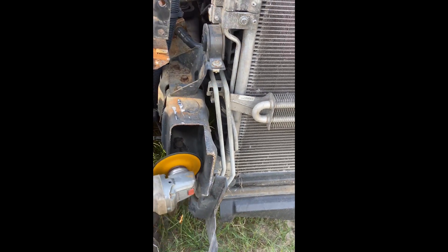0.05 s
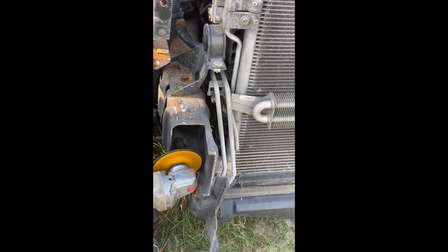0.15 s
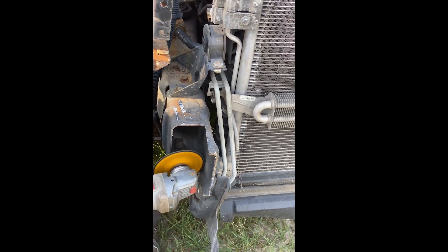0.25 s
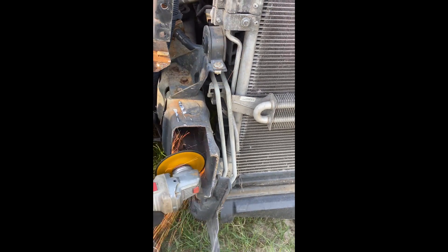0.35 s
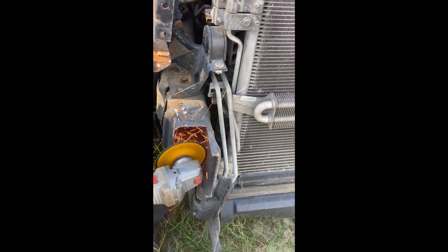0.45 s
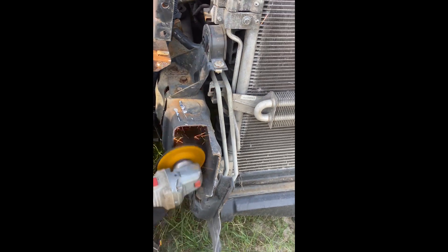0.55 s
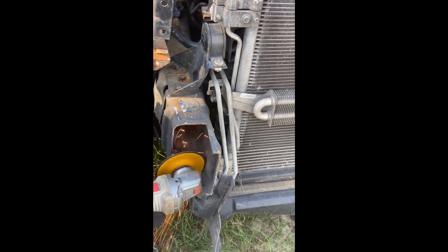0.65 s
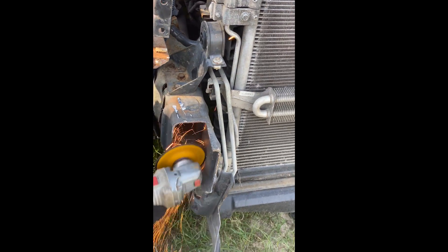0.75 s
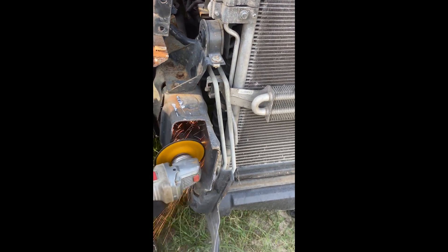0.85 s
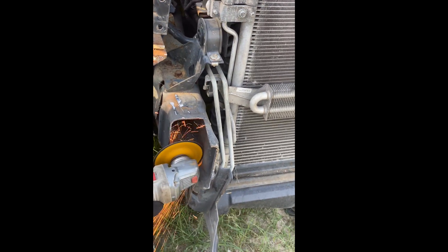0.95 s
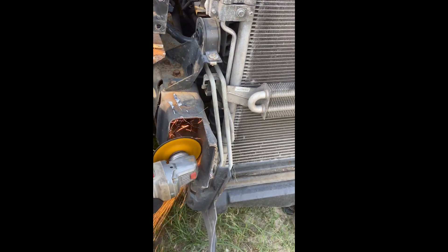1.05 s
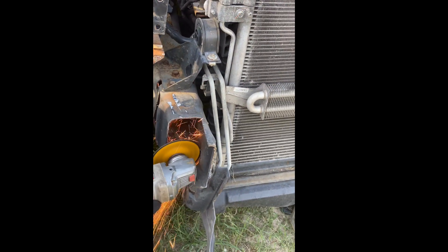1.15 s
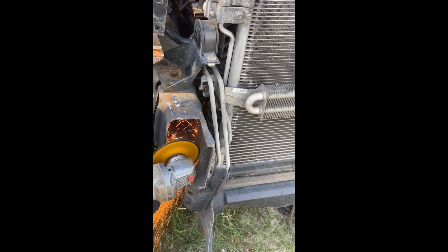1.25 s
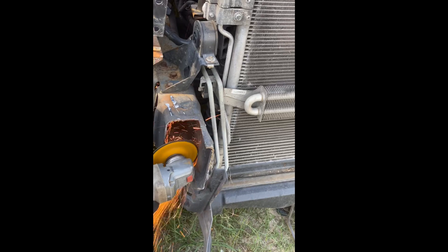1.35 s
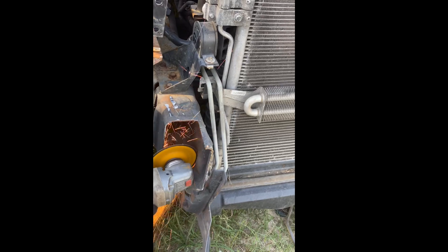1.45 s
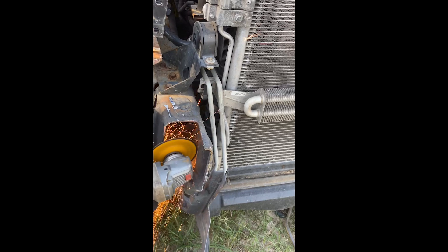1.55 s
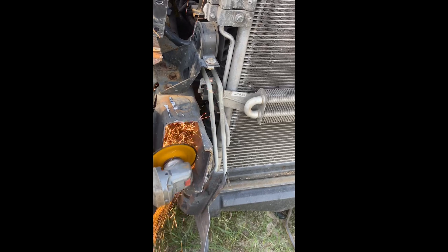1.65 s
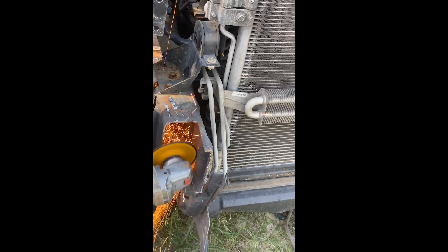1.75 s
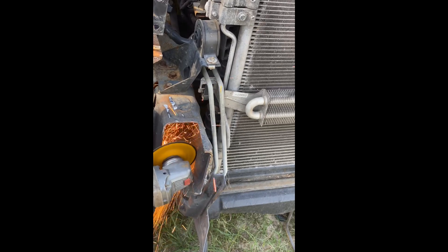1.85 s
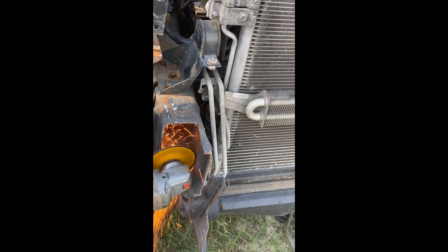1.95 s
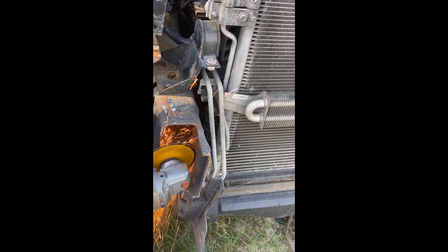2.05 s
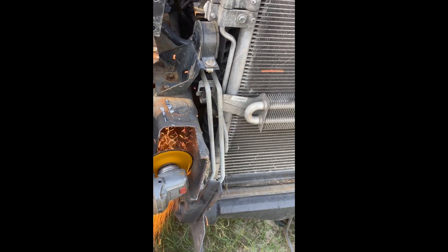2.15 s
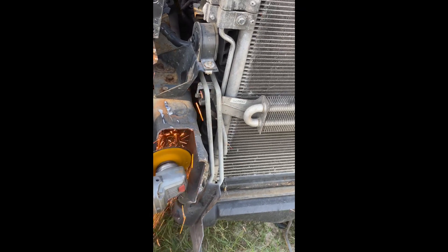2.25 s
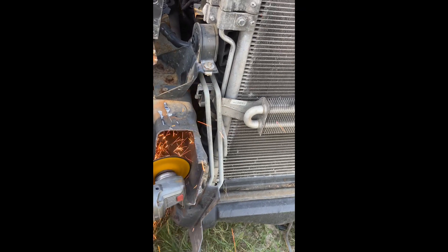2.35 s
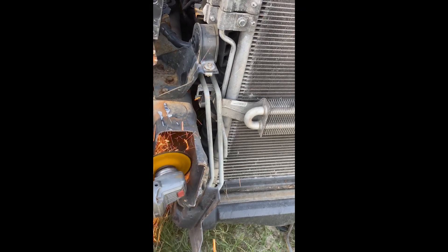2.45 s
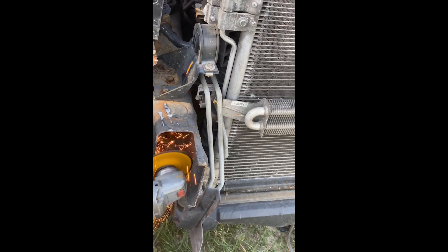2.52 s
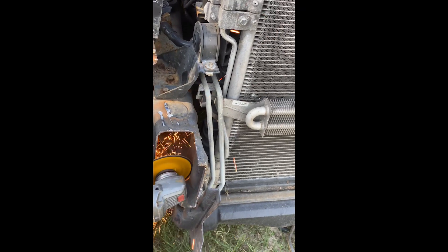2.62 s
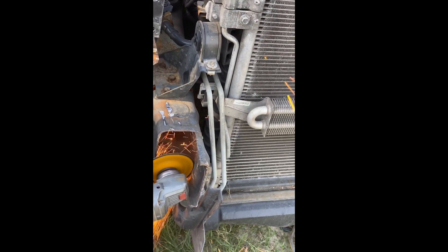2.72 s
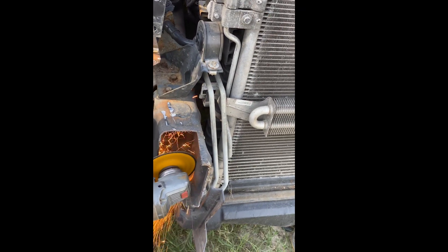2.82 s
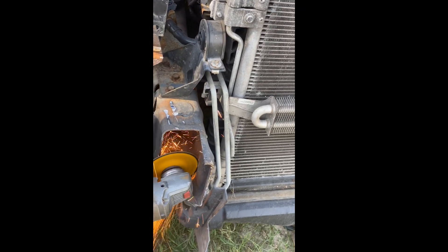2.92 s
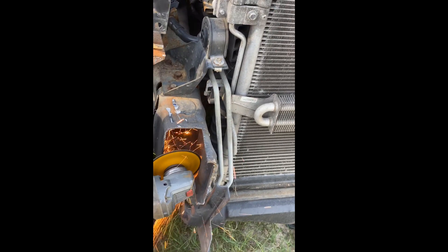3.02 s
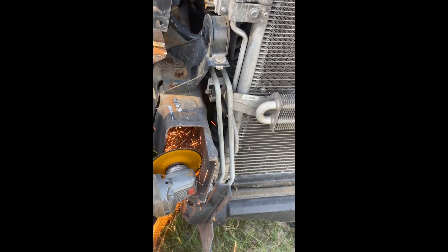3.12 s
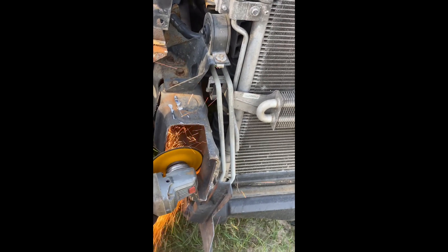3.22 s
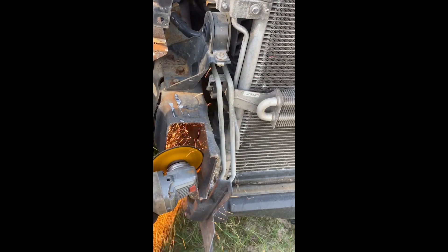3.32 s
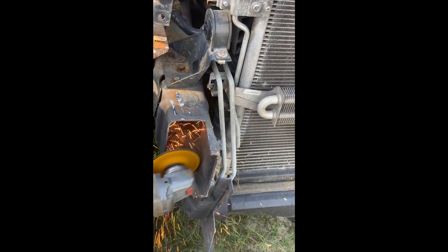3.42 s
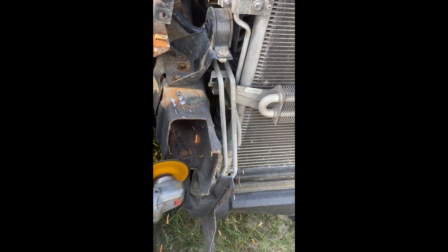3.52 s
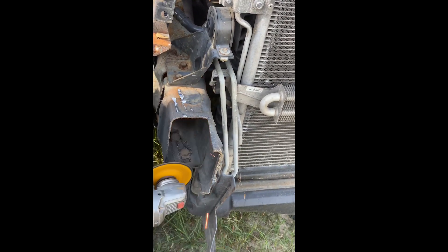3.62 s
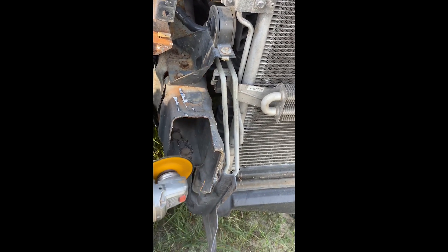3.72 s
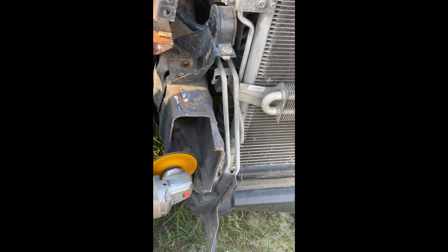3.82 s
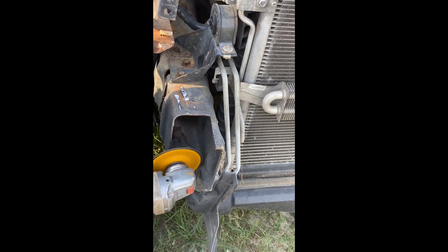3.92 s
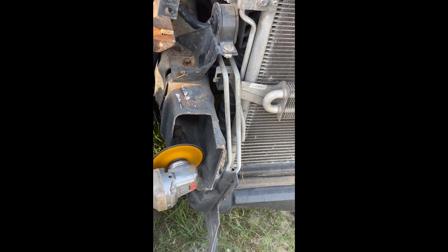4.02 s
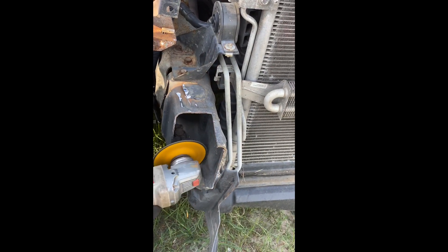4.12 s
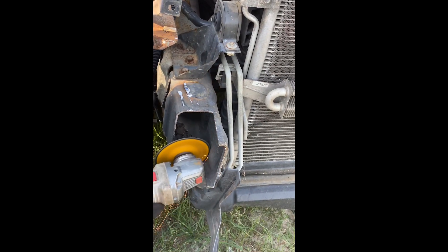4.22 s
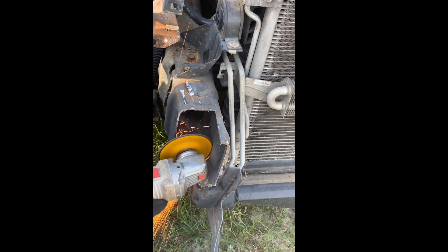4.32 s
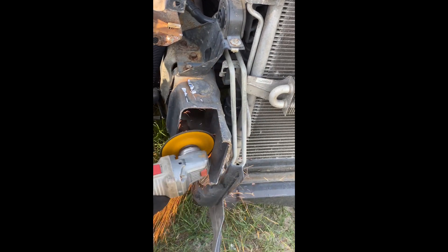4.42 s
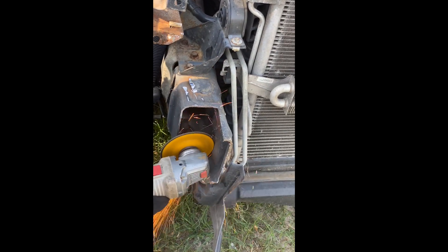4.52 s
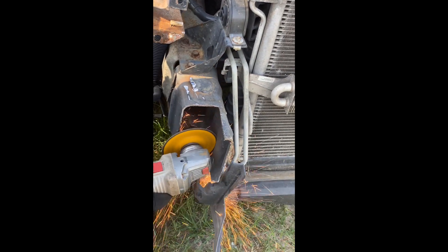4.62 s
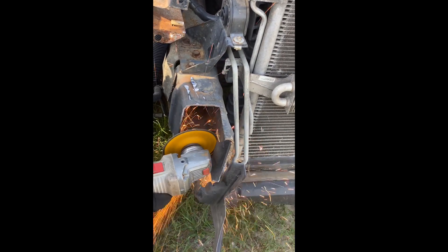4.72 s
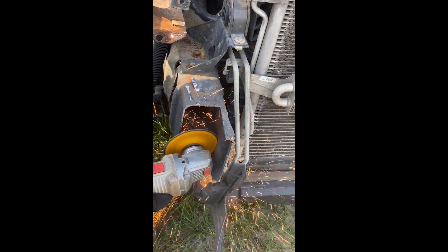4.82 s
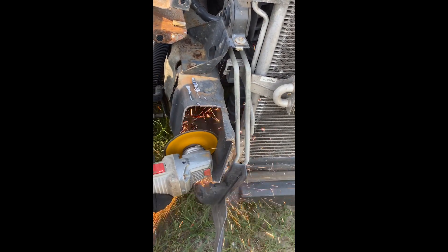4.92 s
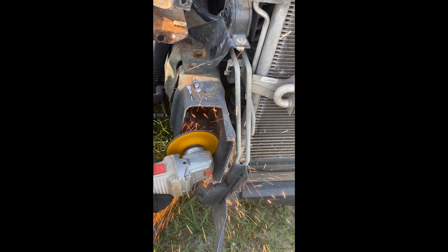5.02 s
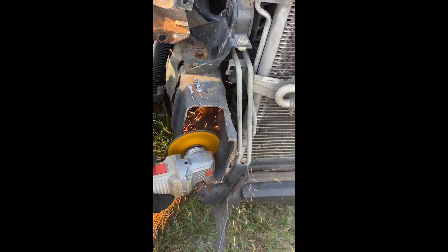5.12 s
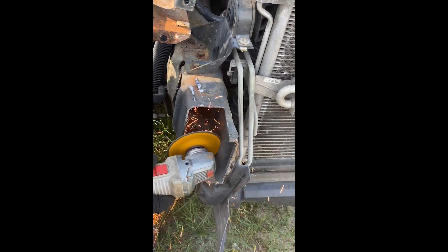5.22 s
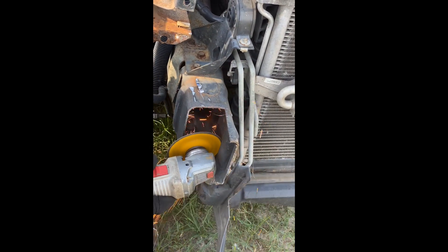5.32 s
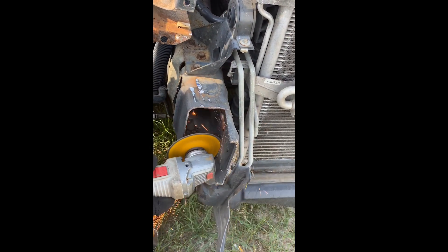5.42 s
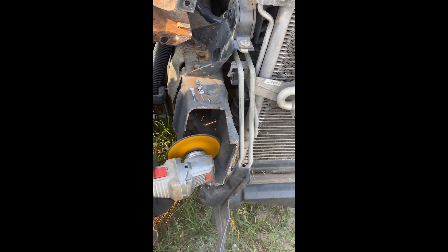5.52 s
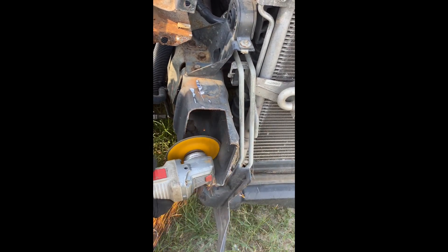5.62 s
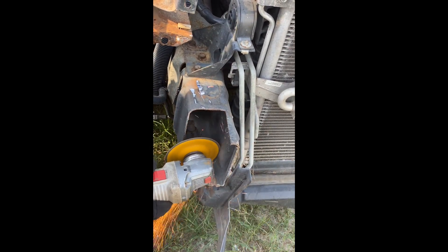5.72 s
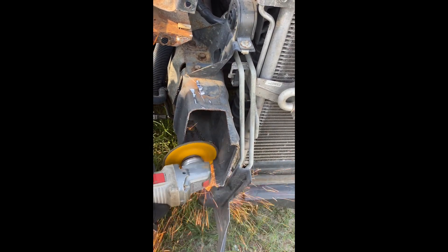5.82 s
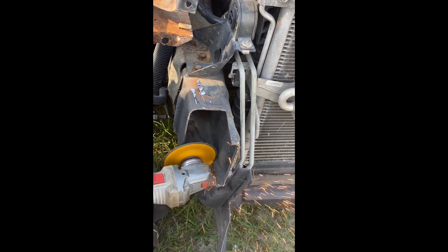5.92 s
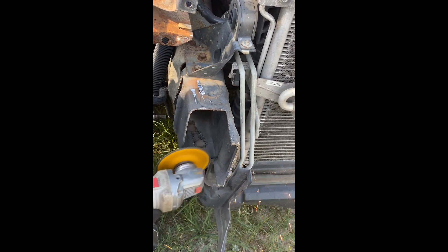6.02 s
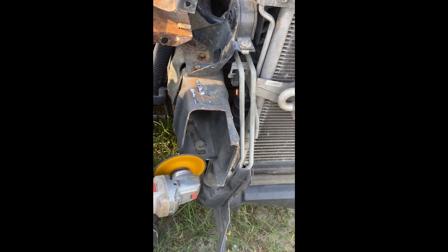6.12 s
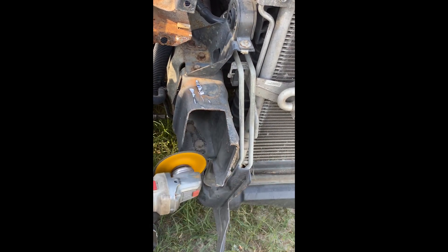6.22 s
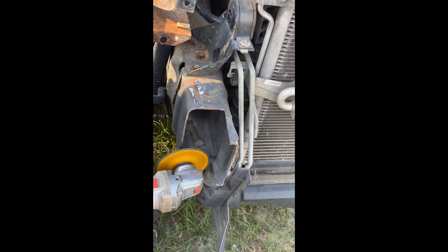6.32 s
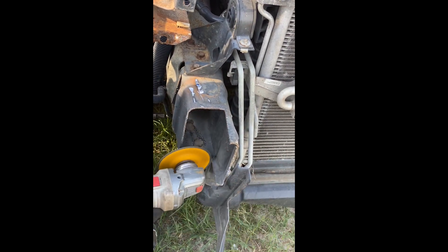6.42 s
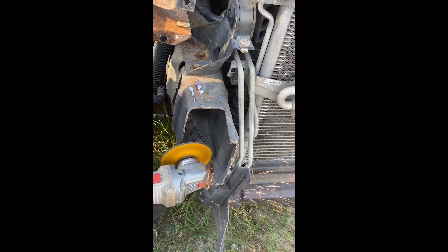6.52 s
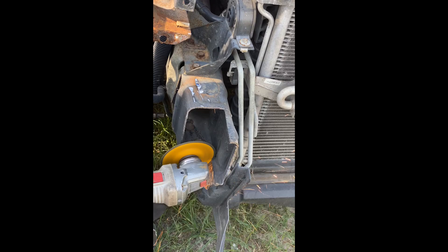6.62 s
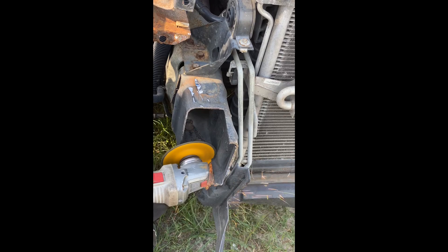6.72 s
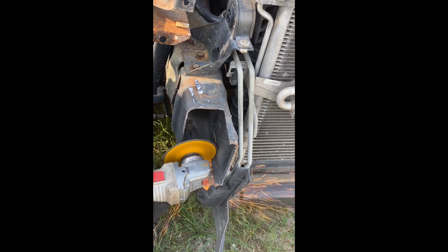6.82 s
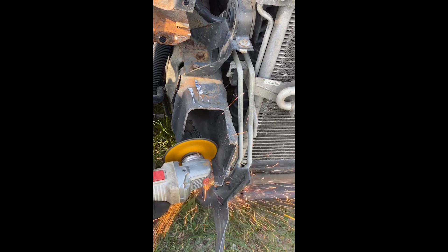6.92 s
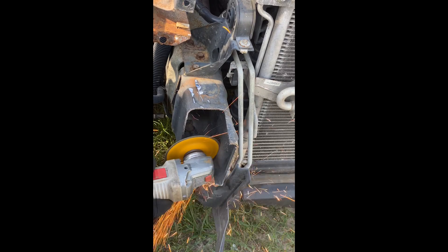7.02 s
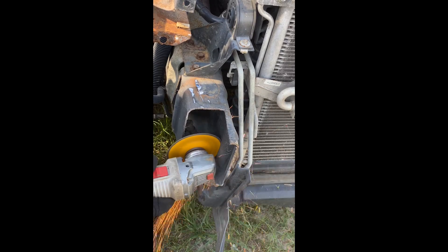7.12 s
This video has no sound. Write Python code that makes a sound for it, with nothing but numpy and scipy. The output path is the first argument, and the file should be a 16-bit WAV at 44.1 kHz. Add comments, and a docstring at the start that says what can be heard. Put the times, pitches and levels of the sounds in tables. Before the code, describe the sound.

Close harsh grinding of a spinning disc on ringing hollow steel, broken by two brief lifts where the motor revs up, with wind thumps.

```python
"""Angle grinder on a steel frame

A grinder cuts a steel vehicle frame outdoors, is lifted off twice and bites again; its motor sags under load.
The disc's uneven rim knocks once a turn and rings the frame; its grit hisses as shaped noise.
Air noise and tones locked to the armature make the motor; slack gear teeth click.
Puffs of wind thump on the microphone as pulses of falling pitch."""
import sys
import numpy as np
from scipy import signal
from scipy.fft import rfft, irfft, next_fast_len
from scipy.io import wavfile
from scipy.ndimage import uniform_filter1d

SR = 44100
rng = np.random.default_rng(int(sys.argv[2]) if len(sys.argv) > 2 else 0)


def dump_mix(stems):
    """Bounce the given channels to the path in sys.argv[1] as a 16-bit WAV at rate SR."""
    frames = np.atleast_2d(stems).T  # one column per channel
    limited = np.clip(frames, -1, 1)  # hard clip at full scale
    pcm = np.round(limited * 32767).astype(np.int16)
    wavfile.write(sys.argv[1], SR, pcm)


N = 315749
T = np.arange(N) / SR
SIZE = next_fast_len(N)
HZ = np.arange(SIZE // 2 + 1) * SR / SIZE


def undb(db):
    """Decibels to gain."""
    return 10 ** (np.asarray(db) / 20)


def unit(x):
    """Scale to rms 1."""
    return x / np.sqrt(np.mean(x ** 2))


def curve(rows):
    """Columns of a table over time, one value a sample."""
    s, *columns = np.transpose(rows)
    return [np.interp(T, s, c) for c in columns]


def over_hz(rows, hz):
    """Read (Hz, value) points on a log-frequency axis."""
    f, v = np.transpose(rows)
    return np.interp(np.log(hz + 1), np.log(f + 1), v)


def walk(rate_hz):
    """Random levels held 1 / rate_hz seconds and slewed twice; spread near 1."""
    k = int(SR / rate_hz)
    steps = np.repeat(rng.standard_normal(N // k + 1), k)
    return 1.31 * uniform_filter1d(uniform_filter1d(steps, k), k)[:N]


def colour(x, rows):
    """Shape a sound by a spectrum of (Hz, dB) points, then scale to rms 1."""
    return unit(irfft(rfft(x, SIZE) * undb(over_hz(rows, HZ)), SIZE)[:N])


def resonate(x, hz, width_hz):
    """One resonance driven by x."""
    return signal.lfilter(*signal.iirpeak(hz, hz / width_hz, SR), x)


def ring(x, modes, wander_db, rate_hz):
    """Resonances, neighbours in opposite sign; each swells and fades as the point of contact moves."""
    total = 0
    for k, (hz, width_hz, db) in enumerate(modes):
        level = undb(db + wander_db * walk(rate_hz))
        total = total + (-1) ** k * level * resonate(x, hz, width_hz)
    return unit(total)


# Armature speed under load. Each row: time in seconds, speed in turns per second.
LOADED_SPEED = [(0, 633), (.4, 614), (.5, 604), (.93, 576), (1.17, 539), (1.39, 497), (1.49, 453),
                (1.62, 443), (1.73, 410), (1.85, 406), (1.97, 386), (2.09, 385), (2.17, 364), (2.27, 381),
                (2.42, 369), (2.62, 393), (2.79, 367), (3.06, 360), (3.25, 345), (3.31, 353), (4.15, 608),
                (4.25, 598), (4.4, 567), (4.84, 446), (4.98, 419), (5.2, 397), (5.3, 384), (5.62, 380),
                (5.68, 372), (5.81, 400), (6.4, 592), (6.64, 601), (6.77, 590), (6.93, 553), (7.16, 550)]
# Spells off the steel. Each row: start in seconds, end in seconds.
LIFT_SPELLS = [(3.31, 4.15), (5.81, 6.4)]
FREE_HZ, SPIN_UP_S = 629, .32  # armature turns per second; time constant


def armature_hz():
    """Speed under load, and an exponential spin-up towards free speed after each lift."""
    hz = curve(LOADED_SPEED)[0]
    for start, end in LIFT_SPELLS:
        lack = FREE_HZ - hz[int(start * SR)]
        spin_up = FREE_HZ - lack * np.exp(-(T - start) / SPIN_UP_S)
        hz = np.where((T > start) & (T < end), spin_up, hz)
    return uniform_filter1d(hz, size=SR // 30)


# The cut. Each row: time in seconds, level of the frame's ring in dB,
# its deep part in dB over that ring, grit hiss in dB over that ring.
CUT_LEVELS = [(0, -36.5, 2, 13), (.17, -36, -0.5, 8.5), (.42, -36.5, 5, 5.5), (.58, -32.5, -3, 11.5),
              (.7, -27.5, -4.5, 7), (.85, -29, -1, 3.5), (.94, -31, 2.5, 6), (1.12, -30.5, -1.5, 0),
              (1.3, -30, 2, 6), (1.5, -27.5, -1, 7), (1.75, -29, -4, 5.5), (2.0, -28, -4, 2.5),
              (2.45, -28, -4.5, 4), (2.58, -30.5, -2, 4.5), (2.75, -27, -5, 3), (2.88, -30.5, -0.5, 2.5),
              (3.05, -31, -2, 5), (3.24, -29.5, -4, 2), (3.31, -31, -11, 2.5), (3.37, -32.5, -17, 1),
              (3.42, -37, -31, -60), (3.6, -50, -14, -6), (3.8, -34, -33, -17), (3.95, -34, 4, 0),
              (4.1, -33.5, -1.5, 14), (4.29, -29.5, -4.5, 6), (4.53, -28.5, -3, 9.5),
              (4.63, -23.5, -7, 3.5), (4.84, -23.5, -9, 2), (4.95, -27.5, -5.5, 4.5),
              (5.2, -27.5, -5.5, 1.5), (5.5, -27, -4.5, 2), (5.68, -28, -7.5, 2), (5.77, -30.5, -9, 8),
              (5.83, -34, 6, 7), (5.92, -33.5, -8, 11), (5.96, -36.5, -34, -14), (6.3, -53, -10, -19),
              (6.37, -33.5, 1, -13), (6.44, -34.5, 4.5, 18), (6.68, -33.5, -3.5, 10),
              (6.85, -26.5, -11.5, 7), (7.0, -30.5, -12.5, 10), (7.16, -30, -8.5, 9)]
# The disc bites. Each row: centre in seconds, half length in seconds, dB added to the ring.
BITE_EVENTS = [(0.091, 0.096, 5.5), (0.203, 0.02, 6), (0.262, 0.014, 5.5), (0.332, 0.06, 12),
               (0.446, 0.023, 6.5), (0.48, 0.055, 4), (1.005, 0.07, 3.5), (1.079, 0.0099, 5),
               (1.187, 0.063, 4.5), (1.974, 0.026, 3), (2.157, 0.041, 3), (2.23, 0.036, 1.5),
               (2.493, 0.03, 2), (2.683, 0.024, 1.5), (4.213, 0.019, 2.5), (4.334, 0.019, 4.5),
               (4.41, 0.033, 2.5), (4.553, 0.014, 1.5), (5.671, 0.012, 2), (6.84, 0.048, -2)]
# How the disc sits in the kerf. Each row: time in seconds, share 0-1 of the scrape that
# comes back alike each turn, wobble in dB over the ring.
SEAT_CURVE = [(0, 0.02, -42), (.7, 0.43, -52), (.95, 0.56, -48), (1.2, 0.4, -30), (1.6, 0.92, -26),
              (2.15, 0.4, -21), (2.3, 0.56, -14.5), (2.7, 0.8, -19.5), (3.08, 0.42, -14),
              (3.3, 0.31, -16.5), (3.4, 0.06, -66), (4.25, 0.3, -26), (4.5, 0.3, -45), (4.7, 0.17, -60),
              (5, 0.1, -15), (5.7, 0.09, -18), (6, 0.37, -53), (7.16, 0.46, -97)]
BITE_DEEP, BITE_GRIT = 0.31, 1  # share of a bite that the deep ring and the grit follow
WANDER_DB = -0.05  # slight random wander of the cut's level
GEAR = 3.7  # armature turns per disc turn
MOTOR_DB = -34  # air and gears of the motor


def cut(hz, motor_share):
    """The rim and loose grit shake the frame; bites of the disc lift its ring."""
    turns = np.cumsum(hz) / SR / GEAR
    ring_db, deep_db, grit_db = curve(CUT_LEVELS)
    bite_db = WANDER_DB * walk(25)
    for s, half_s, db in BITE_EVENTS:
        bite_db = bite_db + db * np.exp(-((T - s) / half_s) ** 2)
    # ring_db scales the whole cut, so take back what a part does not follow
    ring_db = ring_db + bite_db
    deep_db = deep_db - (1 - BITE_DEEP) * bite_db
    grit_db = grit_db - (1 - BITE_GRIT) * bite_db
    share, wobble_db = curve(SEAT_CURVE)
    share = np.clip(share, 0, 1)
    grains = unit(rng.standard_normal(N) * undb(2.15 * np.minimum(rng.exponential(size=N), 6)))

    parts = frame(turns, share, grains, ring_db + wobble_db, deep_db)
    parts = parts + gear_whistle(hz, turns, share, wobble_db)
    parts = parts + disc_wobble(turns, share, grains, wobble_db)
    parts = parts + undb(grit_db) * grit_hiss(turns, grains)
    # off the steel only the motor is left
    contact = np.sqrt(np.clip(1 - motor_share * undb(MOTOR_DB - ring_db) ** 2, 0, 1))
    return contact * undb(ring_db) * parts


# Frame resonances, four groups. Each row: frequency in Hz, width in Hz, level in dB.
DEEP_MODES = [(368, 48, -2), (719, 33, -1), (892, 75, -0.5), (1029, 125, -3.5), (1288, 144, -5.5),
              (1541, 55, -3)]
HIGH_MODES = [(1705, 233, -2), (2074, 184, 6), (2477, 133, 5), (2960, 266, 5.5)]
TOP_MODES = [(3501, 73, 7), (3830, 320, 2.5), (4045, 78, 1.5), (4450, 100, 3)]
MAIN_MODES = [(2660, 170, 0), (2830, 190, 0)]
# Topmost ring. Each row: time in seconds, level in dB over the rest of the ring.
TOP_LEVEL = [(0, 5), (.3, -7), (.6, -3.5), (1.2, -6.5), (1.9, -3), (2.5, -3), (3.0, -4.5), (3.3, -1.5),
             (3.5, -8), (4.2, -24), (4.6, -11), (4.9, -13), (5.1, -7.5), (5.4, -3), (5.7, 2), (5.85, -16),
             (6.4, -27), (6.8, -22), (7.16, -9)]
# Strongest resonance, which depends on where the disc sits.
# Each row: time in seconds, level in dB over the rest of the ring.
MAIN_LEVEL = [(0, 2.5), (.35, -2), (.6, -4), (1.0, 0.5), (1.4, -6.5), (1.9, -3), (2.3, -7), (2.75, -1.5),
              (3.2, -10), (3.6, -12), (4.15, 0), (4.6, -8), (4.9, -9), (5.15, -22), (5.5, -20),
              (5.67, -2.5), (5.9, -2), (6.4, -28), (6.7, -4), (6.9, -2.5), (7.16, -6)]
THROB, TOP_THROB = 0.025, 0.29  # once-a-turn depth: high and main ring, topmost ring
KNOCK, KNOCK_DOUBLES_DB = 4.3, -42  # high spot over the bumps; wobble level at which it doubles


def frame(turns, share, grains, wobble_level_db, deep_db):
    """Rim and grit forces drive the steel's resonances, which throb once a turn."""
    knock = KNOCK * (1 + undb(wobble_level_db - KNOCK_DOUBLES_DB))
    rim_high = rim(turns, knock, knock_scatter_db=3.5, memory=.84)
    rim_deep = rim(turns, knock, knock_scatter_db=3.5, memory=.93)
    # fine bumps wear faster, so the high modes feel less of the repeating part
    share_high = np.clip(.9 * share, 0, 1)
    share_deep = np.clip(1 - (1 - share) ** 1.7, 0, 1)
    # the stiff frame radiates little bass
    stiff = [(100, -28), (300, -19.5), (600, 12.5)]
    jolt = undb(0.75 * walk(60))

    def force(edge, repeating):
        """Mix the repeating rim with loose grit by power."""
        return colour((np.sqrt(repeating) * edge + np.sqrt(1 - repeating) * grains) * jolt, stiff)

    force_high, force_deep = force(rim_high, share_high), force(rim_deep, share_deep)
    high = ring(force_high, HIGH_MODES, 1.3, 11)
    deep = ring(force_deep, DEEP_MODES, 1.3, 11)
    top = ring(force_high, TOP_MODES, 1.3, 11)
    main = ring(force_high, MAIN_MODES, 1.3, 11)
    beat = np.cos(2 * np.pi * turns)
    sound = (high + undb(curve(MAIN_LEVEL)[0]) * main) * (1 + THROB * beat)
    sound = sound + undb(deep_db) * deep
    sound = sound + undb(curve(TOP_LEVEL)[0]) * top * (1 + TOP_THROB * beat)
    # each knock also cracks over a wide band
    return sound + undb(-9.5) * ring(force_high, [(3220, 1900, 0)], 3.2, 20)


def rim(turns, knock, knock_scatter_db, memory, count=128):
    """Force of the rim: bumps that wear slowly from turn to turn, and one high spot that knocks."""
    rows = int(turns[-1]) + 2
    fresh = rng.standard_normal((rows, count))
    bumps = signal.lfilter([np.sqrt(1 - memory ** 2)], [1, -memory], fresh, axis=0)
    scatter = undb(knock_scatter_db * rng.standard_normal(rows))
    bumps[:, 0] += np.interp(np.arange(rows), turns, knock) * scatter
    return unit(np.interp(turns * count, np.arange(rows * count), bumps.ravel() - bumps.mean()))


# Grit on steel. Each row: frequency in Hz, level in dB per Hz.
GRIT_SPECTRUM = [(1000, -20), (2500, -6), (4200, -3), (5200, 0), (7000, -1), (8400, 1), (10300, -2.5),
                 (11300, -2), (12000, -4), (13000, -3.5), (14000, -2.5), (15500, 0)]
# Ring of the thin disc. Each row: frequency in Hz, width in Hz, level in dB.
DISC_MODES = [(5300, 60, 12), (6300, 43, 8), (7500, 120, 8), (8680, 1060, 13.5), (9740, 420, 13),
              (13400, 1200, 17), (14800, 250, -4)]
DISC_DB = -7  # re grit noise


def grit_hiss(turns, grains):
    """Grain noise plus the disc's ring, hissing harder as the high spot passes."""
    # reversed grains keep the ring independent of the noise
    hiss = colour(grains, GRIT_SPECTRUM) + undb(DISC_DB) * ring(grains[::-1], DISC_MODES, 4.0, 14)
    flicker = undb(1.48 * walk(90) + 0.67 * walk(7))
    return hiss * (1 + 0.23 * np.cos(2 * np.pi * turns)) * flicker


# Wobble of the loaded disc. Each row: multiple of the disc speed, level in dB.
WOBBLE_PARTIALS = [(1, -4), (2, -1.5), (3, -6), (4, -2)]
# The hollow beam. Each row: frequency in Hz, width in Hz, level in dB.
BEAM_MODES = [(340, 28, 0)]


def disc_wobble(turns, share, grains, wobble_db):
    """Harmonics of the disc speed; a loosely seated disc wobbles off the beat and mostly booms in the beam."""
    slip = turns + 0.066 * (1 - share) ** 2 * walk(50)
    tones = 0
    for k, db in WOBBLE_PARTIALS:
        tones = tones + undb(db + 3.5 * walk(4.7)) * np.sin(2 * np.pi * np.round(k) * slip)
    boom = 0.62 * (1 - share) * ring(grains, BEAM_MODES, 1.9, 27)
    return undb(wobble_db) * (share * tones + boom)


PINION_TEETH = 10
MESH_DB = 4  # re the wobble that loads the teeth
MESH_PEAK_DB, MESH_PEAK_HZ, MESH_WIDTH_HZ = 16, 3510, 130  # swell at a frame resonance
MESH_SMEAR_RAD = 6.0  # phase blur at fully loose seat


def gear_whistle(hz, turns, share, wobble_db):
    """Loaded gear teeth whistle at tooth rate, swelling where it meets a resonance of the frame."""
    off_peak = (PINION_TEETH * hz - MESH_PEAK_HZ) / MESH_WIDTH_HZ
    mesh_db = wobble_db + MESH_DB + MESH_PEAK_DB * np.exp(-off_peak ** 2)
    blur = .5 * walk(150) + MESH_SMEAR_RAD * (1 - share) ** 5 * walk(370)
    tone = np.sqrt(2) * np.sin(2 * np.pi * PINION_TEETH * GEAR * turns + blur)
    return undb(mesh_db + 0.95 * walk(25.36)) * tone


# The rim snags. Each row: start in seconds, envelope level in dB before the rise, t60 in seconds.
SNAG_EVENTS = [(0.031, -21, .12), (0.188, -26, .1), (0.2518, -18, 0.056), (0.299, -16, .1),
               (0.321, -19, .12), (0.431, -12, 0.1), (0.5615, -20, .12), (0.604, -27, .1),
               (0.9634, -27, .1), (1.096, -20, .1), (3.371, -20.5, 0.095), (3.9945, -19, .1),
               (4.3105, -28, 0.11), (4.602, -28, .1), (5.2145, -19, .1), (5.388, -17.5, 0.092),
               (5.922, -15, 0.024), (6.382, -36, 0.092), (6.3906, -11, 0.028), (6.399, -17, .03),
               (6.404, -19, .03), (6.411, -17, 0.033), (6.436, -26, .12), (6.4477, -19, 0.046),
               (6.461, -22, .04), (6.474, -25, 0.045), (6.525, -22, .08), (6.69, -16, .04),
               (6.701, -14, 0.033), (6.788, -17, .05)]
SNAG_RISE_S = 0.00075


def snags():
    """Short bright noise bursts when the rim catches an edge."""
    size, t = np.zeros(N), T[:SR // 4]
    for s, db, t60_s in SNAG_EVENTS:
        start = int(s * SR)
        rise = 1 - np.exp(-t / SNAG_RISE_S)
        size[start:start + len(t)] += undb(db) * rise * np.exp(-np.log(1000) * t / t60_s)
    return size * colour(rng.standard_normal(N), GRIT_SPECTRUM)


# Brief notes, mostly of single frame parts; the row at 5.46 s is the seventh multiple of the disc speed. Each
# row: centre in seconds, half length in seconds, frequency in Hz, level at the centre in dB rms.
SING_EVENTS = [(0.313, 0.017, 1856, -28), (0.34, 0.024, 2140, -29), (0.982, 0.064, 925, -28.5),
               (1.03, .05, 1064, -32), (1.27, 0.043, 980, -31), (1.65, .06, 1062, -36),
               (1.198, 0.043, 1290, -28), (1.844, 0.17, 991, -33.5), (2.536, 0.04, 915, -30),
               (2.564, 0.034, 1344, -35), (2.86, .08, 1175, -38), (4.238, 0.055, 1305, -33),
               (4.333, 0.016, 2090, -28), (4.554, 0.0098, 1410, -27), (5.46, 0.15, 722, -41.5),
               (5.82, 0.013, 1040, -38)]
SING_BLUR_RAD = 0.55


def sings():
    """Brief, slightly rough notes of single frame parts, and one held tone of the disc."""
    blur = SING_BLUR_RAD * walk(120)
    notes = 0
    for s, half_s, hz, db in SING_EVENTS:
        swell = undb(db) * np.exp(-((T - s) / half_s) ** 2)
        notes = notes + swell * np.sin(2 * np.pi * hz * T + blur)
    return np.sqrt(2) * notes


# Air and gears. Each row: frequency in Hz, level in dB per Hz.
MOTOR_SPECTRUM = [(150, -20), (300, -19), (450, -17), (700, -2), (1100, -4.5), (1500, -7), (1900, -8),
                  (2300, -11.5), (2600, -5), (2900, 0), (3300, -3.5), (3800, 0), (4500, -6), (8000, -5),
                  (10500, -8), (12000, -12), (14500, -11), (15600, -6)]
# Unbalance, fan blades, commutator bars. Each row: multiple of the armature speed,
# base level in dB rms, wander in dB, blur in radians.
WHINE_TONES = [(1, -48.5, 1, .1), (15, -42.5, 1.5, .1), (30, -49, 3, 1.1)]
# The casing carries the unbalance unevenly. Each row: frequency in Hz, gain in dB.
CASING_GAIN = [(340, -1.5), (400, -2), (470, -26), (525, -2.5), (570, 5), (620, 2)]
# Reach to the microphone as the tool is turned.
# Each row: time in seconds, unbalance in dB, fan and brushes in dB.
TURNED_GAIN = [(0, 3.5, -3), (.6, -0.5, -3), (1.3, 0.5, 0), (3.3, 0, -10), (3.6, -6, -3), (3.85, -2, 1),
               (4.1, 3, 5), (4.5, -1.5, 1), (5.8, 0.5, -9), (6.1, -8, -6), (6.35, -2.5, -1), (6.45, -1, -6),
               (7.16, -3.5, -4)]
FAN_POWER = 3  # fan and brush tones grow steeply with speed


def motor(hz):
    """Air noise that grows with speed, and armature-locked tones which a hard cut shakes out of tune."""
    air = colour(rng.standard_normal(N), MOTOR_SPECTRUM)
    air = undb(MOTOR_DB + 0.43 * walk(13)) * (hz / 600) ** 0.064 * air
    spin = np.cumsum(hz) / SR
    shake = 1 + 4 * np.clip((curve(CUT_LEVELS)[0] - MOTOR_DB - 3) / 6, 0, 1)
    tones = []
    for k, db, wander_db, blur_rad in WHINE_TONES:
        phase = 2 * np.pi * k * spin + blur_rad * shake * walk(500)
        tones.append(undb(db + wander_db * walk(10)) * np.sin(phase))
    unbalance_db, fan_db = curve(TURNED_GAIN)
    unbalance = tones[0] * undb(over_hz(CASING_GAIN, hz) + unbalance_db)
    fan_and_brushes = undb(fan_db) * (hz / FREE_HZ) ** FAN_POWER * sum(tones[1:])
    return air + np.sqrt(2) * (unbalance + fan_and_brushes)


# Loudest ticks. Each row: time in seconds, click level in dB.
TICK_EVENTS = [(3.4845, -24), (3.5126, -24), (3.573, -26), (3.6309, -23), (3.6663, -28), (3.7057, -22),
               (3.8314, -26), (6.0062, -28), (6.0635, -28), (6.2392, -21), (6.272, -27), (6.3225, -22)]
# Gear housing. Each row: frequency in Hz, width in Hz, level in dB.
HOUSING_MODES = [(3700, 900, -6), (6050, 600, 0)]
RATTLE_PER_S, RATTLE_DB = 70, -35  # mean rate; level of the weakest random click


def rattle():
    """Slack teeth click at random and at listed ticks, and ring the gear housing."""
    when, size = rng.random(N), rng.exponential(size=N)
    clicks = (when < RATTLE_PER_S / SR) * undb(RATTLE_DB + 3.0 * np.minimum(size, 3))
    s, db = np.transpose(TICK_EVENTS)
    clicks[(s * SR).astype(int)] = undb(db)
    sound = 0
    for hz, width_hz, mode_db in HOUSING_MODES:
        # undo the narrow filter's loss on a single click
        gain = undb(mode_db) * SR / (2 * np.pi * width_hz)
        sound = sound + gain * resonate(clicks, hz, width_hz)
    return sound


# Changing wind rumble on the microphone between the puffs. Each row: time in seconds, level in dB.
WIND_LEVEL = [(0, -38), (.3, -51.5), (.5, -52), (.7, -82), (1.7, -87), (1.95, -58), (2.6, -66), (3.05, -54),
              (3.2, -52), (3.4, -45.5), (3.52, -47), (3.6, -49), (3.72, -45), (3.84, -53), (4.0, -56),
              (4.2, -63), (4.6, -59), (5.0, -72), (5.3, -50.5), (5.65, -54), (5.75, -112), (6.3, -64),
              (6.7, -63), (7.16, -55.5)]
# Strongest puffs. Each row: start in seconds, thump level in dB,
# peak of the following rumble's envelope in dB.
PUFF_EVENTS = [(0.063, -29, -53), (0.431, -15.5, -36), (2.168, -33, -62), (3.131, -39, -40),
               (3.264, -52, -57), (3.4, -37, -46), (3.661, -47, -45), (3.698, -44, -42), (3.742, -31, -29),
               (3.885, -37, -44), (3.998, -31, -57), (4.337, -29, -56), (4.403, -24.5, -61),
               (4.532, -40, -46), (4.749, -49, -54), (5.4, -30, -60), (5.498, -34, -57), (5.803, -39, -53),
               (5.91, -95, -68), (6.215, -44, -85), (6.386, -35, -48), (6.455, -37, -66), (6.73, -41, -42),
               (6.875, -38, -48), (6.92, -48, -56), (7.05, -57, -61)]
PUFF_S = 0.0176  # time scale of the thump
PUFF_END_HZ, PUFF_DROP_HZ, PUFF_DROP_S = 55, 627 * 0.233 / 0.21, 0.21 * PUFF_S  # pitch fall
RUMBLE_S, RUMBLE_HZ, RUMBLE_LOOSE = 0.012, 55, 0.74  # time to peak; swing; gain of its noise


def wind():
    """Lumpy rumble; each strong puff is a pulse of falling pitch with a swell of rumble behind it."""
    lumps = rng.standard_normal(N) * undb(2.5 * walk(40))
    size, thumps = undb(curve(WIND_LEVEL)[0]), 0
    for s, db, rumble_db in PUFF_EVENTS:
        t = np.clip(T - s, 0, 1)
        swell = undb(rumble_db) * t / RUMBLE_S * np.exp(1 - t / RUMBLE_S)
        size = size + RUMBLE_LOOSE * swell
        thumps = thumps + swell * np.sin(2 * np.pi * RUMBLE_HZ * t)
        cycles = PUFF_END_HZ * t + PUFF_DROP_HZ * PUFF_DROP_S * (1 - np.exp(-t / PUFF_DROP_S))
        pulse = 2.3 * (t / PUFF_S) ** .5 * np.exp(-t / PUFF_S * 3.65)
        thumps = thumps + undb(db) * pulse * np.sin(2 * np.pi * cycles)
    low = [(20, -41), (38, -14.0), (55, -1), (90, -1.0), (130, -4), (250, -15.0), (500, -22.0), (2000, -70)]
    return thumps + size * colour(lumps, low)


def scene():
    """Everything arrives from one spot, alike in both channels."""
    hz = armature_hz()
    near = cut(hz, motor_share=0.82) + snags() + sings() + motor(hz) + rattle() + wind()
    return np.array([near, near])


# Right channel against the left. Each row: frequency in Hz, loss in dB.
CHANNEL_LOSS = [(250, 0), (400, 1.5), (620, 8), (760, 6), (900, 14), (1030, 7), (1180, 9), (1400, 5),
                (1550, 0)]
# Each row: frequency in Hz, phase lag in radians.
CHANNEL_PHASE = [(0, 0), (260, -.14), (500, .3), (780, .5), (900, -.5), (1050, -.1), (1290, -1.3),
                 (1550, 0), (1900, 0), (2580, 1.15), (3300, .35), (3800, .15), (4200, .4), (4780, 2.7),
                 (4880, np.pi), (4960, 3.6), (5250, 2 * np.pi), (5650, 2 * np.pi), (6800, 7.3),
                 (10500, 8.7), (12000, 3 * np.pi)]
# Each row: frequency in Hz, share 0-1 that is alike in both channels.
CHANNEL_SHARED = [(300, .99), (600, .7), (1200, .62), (1600, 1), (2300, .8), (4000, .8), (4400, .5),
                  (4800, .95), (4920, .99), (5050, .55), (5300, 1), (5650, 1), (6000, .55), (9500, .45),
                  (11500, .6), (12000, 1)]
BOTTOM_HZ, TOP_HZ = 36.2, 15850


def record(dry):
    """The right channel is a filtered copy: loss, phase and partial decorrelation by frequency; band ends cut."""
    alike = over_hz(CHANNEL_SHARED, HZ)
    f, lag_rad = np.transpose(CHANNEL_PHASE)
    # a random quadrature part makes the channels less alike
    noise = rng.standard_normal(9000) * np.exp(-np.arange(9000) / 2500)
    side = np.sign(rfft(noise, SIZE).real)
    path = np.sqrt(alike) + 1j * np.sqrt(1 - alike) * side
    path = path * undb(-over_hz(CHANNEL_LOSS, HZ)) * np.exp(-1j * np.interp(HZ, f, lag_rad))
    right = irfft(rfft(dry[1], SIZE) * path, SIZE)[:N]
    low_cut = signal.butter(2, BOTTOM_HZ, "high", fs=SR, output="sos")
    high_cut = signal.ellip(10, .2, 80, TOP_HZ, fs=SR, output="sos")
    return signal.sosfilt(high_cut, signal.sosfilt(low_cut, np.array([dry[0], right])))


dry = scene()
out = record(dry)
dump_mix(out)
```